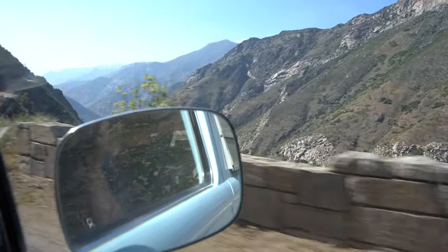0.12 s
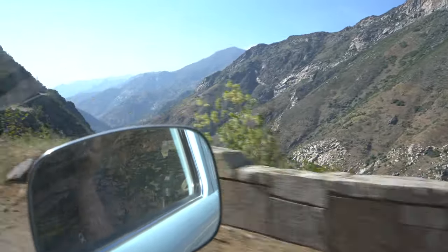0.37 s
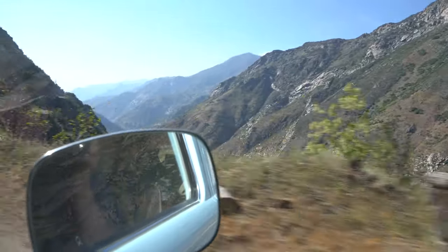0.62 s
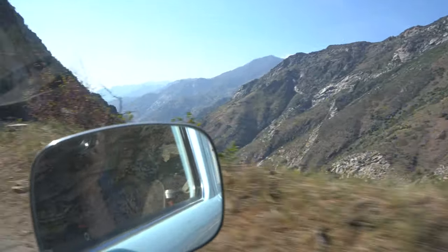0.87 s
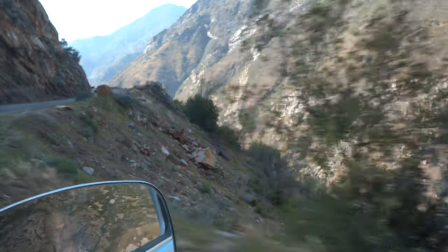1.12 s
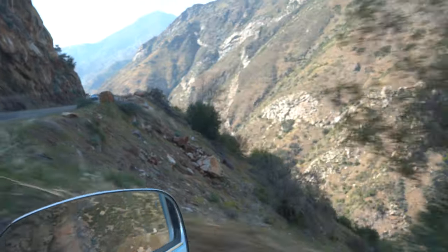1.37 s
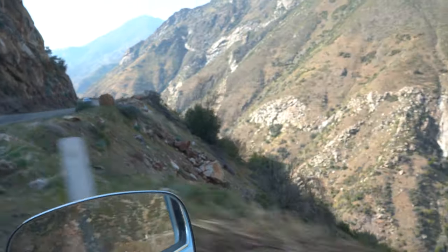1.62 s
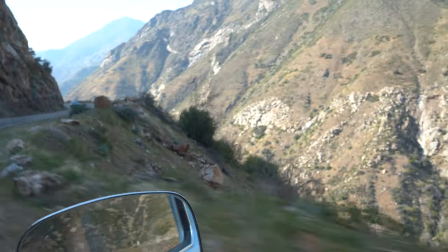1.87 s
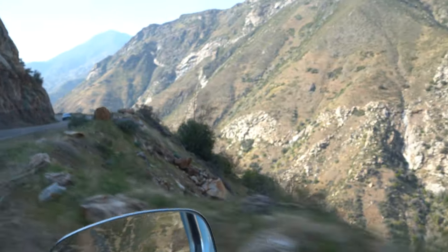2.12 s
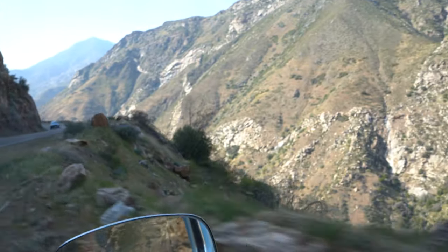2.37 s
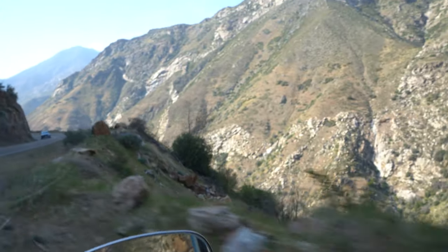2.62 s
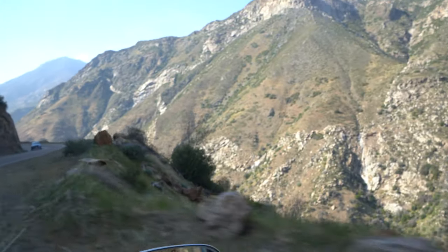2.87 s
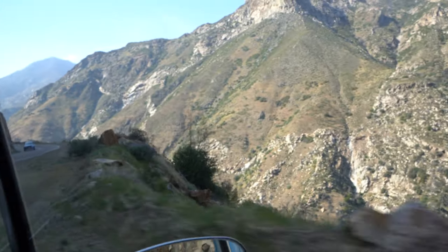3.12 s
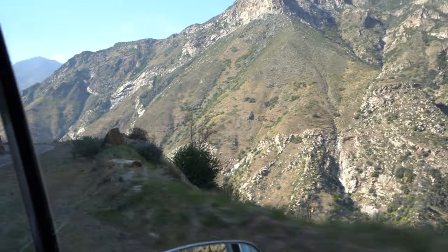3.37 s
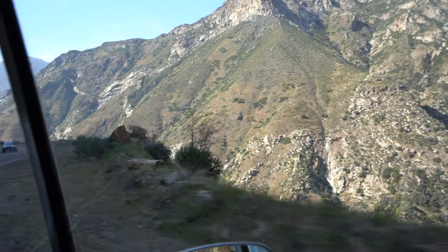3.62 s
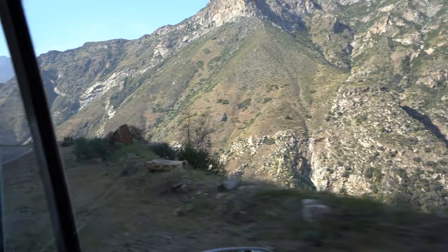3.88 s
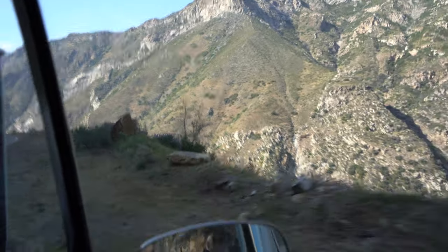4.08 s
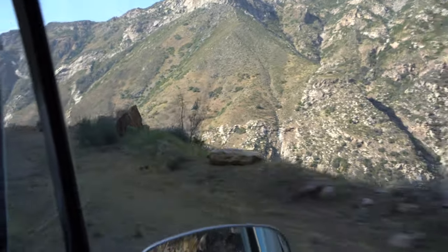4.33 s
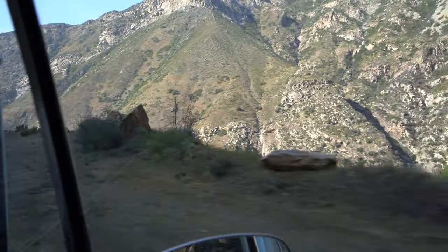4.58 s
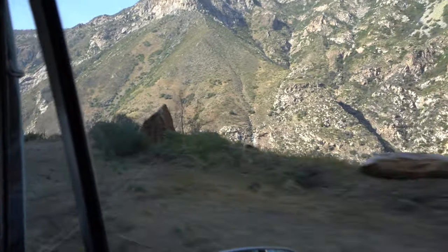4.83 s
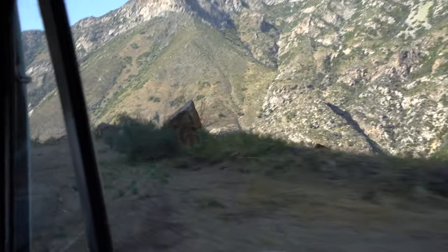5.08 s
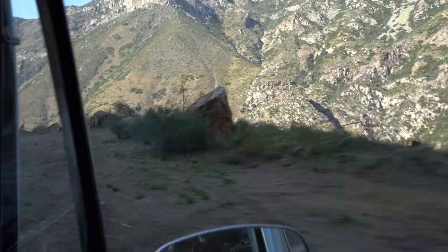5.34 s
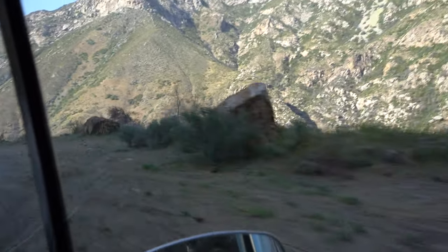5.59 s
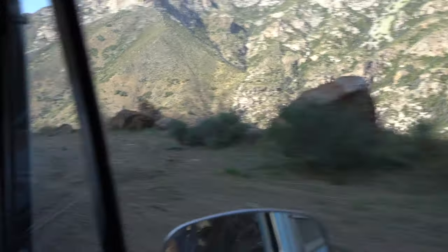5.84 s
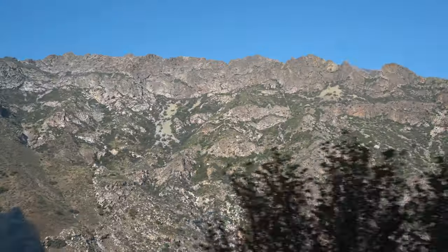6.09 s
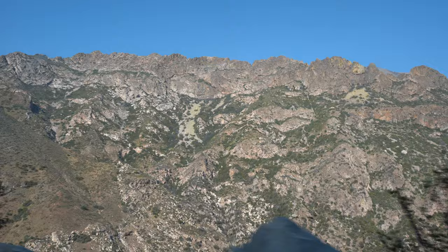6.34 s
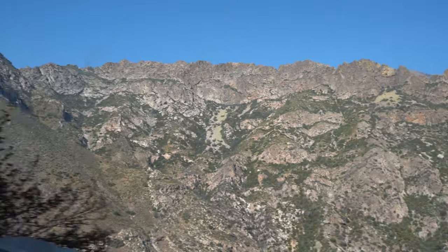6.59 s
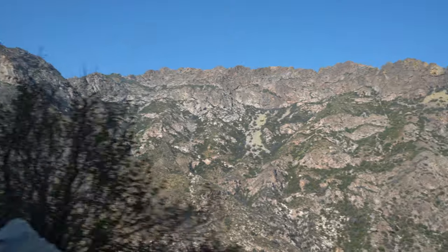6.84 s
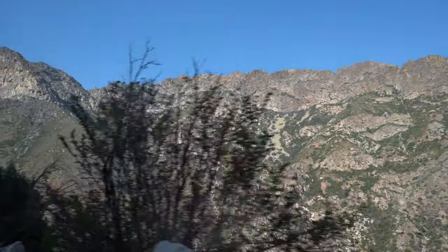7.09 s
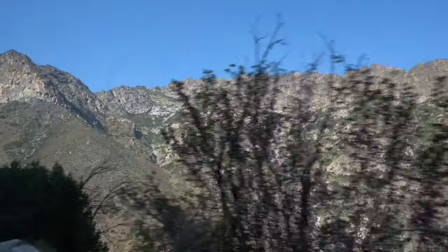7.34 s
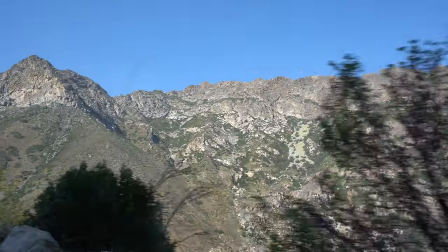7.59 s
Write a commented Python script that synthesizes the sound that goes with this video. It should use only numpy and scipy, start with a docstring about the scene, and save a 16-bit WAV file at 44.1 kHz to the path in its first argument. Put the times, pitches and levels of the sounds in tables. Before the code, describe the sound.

Inside an old van on a mountain road, a steady low air-cooled engine drone over road rumble, with trim rattles, ticks and tiny squeaks.

```python
"""Inside a van with the window open

The cab of a van with an air-cooled four-cylinder engine, on three stretches of road joined by short fades.
The engine is a harmonic series on the four-stroke cycle; road rumble, tyre noise and wind hiss are shaped
noise, coloured by resonances of the cab. Loose trim rattles as bursts of noise ringing through resonances,
a joint squeaks as short harmonic tones, and faint whines are sines that wander in pitch and level.
"""
import sys
import numpy as np
from scipy import signal
from scipy.io import wavfile
from scipy.ndimage import map_coordinates

SR = 44100
rng = np.random.default_rng(int(sys.argv[2]) if len(sys.argv) > 2 else 0)


def wrap_up_sound(samples):
    """Save the sound to the file named by the first command line argument, as 16-bit audio."""
    columns = np.atleast_2d(samples).T
    # keep every value between -1 and 1, then stretch to whole-number steps
    tamed = np.clip(columns, -1, 1)
    steps = np.round(tamed * 32767).astype(np.int16)
    wavfile.write(sys.argv[1], SR, steps)


N = 340011

STEP = 20   # samples between the values of a slow control
SLOW_T = np.arange(0, N + 20 * STEP, STEP) / SR   # times of the slow controls (s)

# Level difference between the ears: (frequency [Hz], left minus right [dB])
EAR_DIFFERENCE = [(60, -5.5), (150, -1.5), (380, -1.5), (950, -1), (2380, -1.0), (5980, 0), (15000, -1)]


def from_db(db):
    """Level to amplitude: 20 dB is a factor of ten."""
    return np.exp(np.asarray(db, float) * np.log(10) / 20)


def rms_one(x):
    """Normalisation to unit root-mean-square value."""
    return x / np.sqrt(np.mean(x ** 2) + 1e-20)


def fine(slow):
    """Linear interpolation of a slow control to one value a sample."""
    return np.interp(np.arange(N) / SR, SLOW_T, slow)


def in_time(stretches):
    """Linear interpolation in time: the columns of the joined tables become slow controls."""
    s, *columns = np.transpose(np.concatenate(stretches))
    return [np.interp(SLOW_T, s, column) for column in columns]


def at_hz(points, hz):
    """Interpolation of a spectrum on a logarithmic frequency axis."""
    table_hz, values = np.array(points).T
    return np.interp(np.log(hz), np.log(table_hz), values)


def drift(rate):
    """Random fluctuation of spread 1: noise through a double-pole low-pass at rate (Hz)."""
    run_in = 6000   # slow steps dropped while the filter settles
    r = np.exp(-2 * np.pi * rate * STEP / SR)
    noise = rng.standard_normal(len(SLOW_T) + run_in)
    slow = signal.lfilter([1], [1, -2 * r, r * r], noise)[run_in:]
    return rms_one(slow - slow.mean())


def resonance(x, hz, width):
    """Two-pole resonance: a damped mode of the given bandwidth (Hz), with gain 1 at its peak."""
    r = np.exp(-np.pi * width / SR)
    zeros = np.array([1, 0, -1]) * (1 - r * r) / 2
    return signal.lfilter(zeros, [1, -2 * r * np.cos(2 * np.pi * hz / SR), r * r], x)


def panned(x, left_db):
    """Interaural level difference: mono to stereo, the left louder by left_db."""
    return np.array([x * from_db(left_db / 2), x * from_db(-left_db / 2)])


def engine(firing_waver_db=.6, waver_db=1.3):
    """Harmonic series: orders of the four-stroke cycle as wavering sines; the load sets their balance."""
    # Multiples of the cycle frequency; order 4 is the firing tone
    orders = [2, 3, 4, 5, 6, 8, 9, 10, 11, 12, 13, 15, 16, 18, 20, 21, 25, 28]
    # Level of each of those orders [dB] at light, half and full load
    light_db = (-35.5, -38, -27, -35.5, -41.5, -41.5, -41.5, -51.5, -66, -48, -56, -57, -70, -63, -65, -68,
                -82, -70)
    half_db = (-48, -43, -25.5, -36, -32.5, -40, -46, -40.5, -40.5, -45, -52, -47, -55.5, -48, -57, -60,
               -73, -61)
    full_db = (-65, -52, -23.5, -31, -49, -50, -39, -30, -43.5, -60, -49, -39.5, -49, -51.5, -57, -51.5,
               -49, -52)
    # Running of the engine: (time [s], firing rate [1/s], load [0-1])
    running = [(0, 71.7, .5), (.99, 72.5, .5), (.995, 75.5, 0), (4.9, 77.2, 0), (5.99, 77.1, 0),
               (6, 71.0, .42), (6.75, 69.6, .42), (6.95, 68.9, 1), (7.71, 68.9, 1)]

    firing_rate, load = in_time([running])
    unsteady_rate = firing_rate * (1 + .001 * drift(4))
    cycle = np.cumsum(np.pi / 2 * unsteady_rate) * STEP / SR   # phase; four firings a cycle
    out = 0
    for order, *load_db in zip(orders, light_db, half_db, full_db):
        waver = (firing_waver_db if order == 4 else waver_db) * drift(4.2)
        level = from_db(np.interp(load, [0, .5, 1], load_db) + waver)
        tone = level * np.sin(order * cycle + rng.uniform(0, 2 * np.pi))
        out = out + panned(tone, at_hz(EAR_DIFFERENCE, 18.5 * order))   # cycle taken as 18.5 Hz
    # the sines were computed at the slow rate
    out = signal.resample_poly(out, STEP, 1, axis=1, window=("kaiser", 10))
    return np.sqrt(2) * out[:, :N]


def road_and_wind(gust_db=1.5, flutter_db=1.0, own_db=1.17):
    """Addition of powers: third-octave noise bands sum the power of rumble, tyres and wind."""
    # Level of the noise, one table a stretch: (time [s], rumble [dB], tyres [dB], wind [dB])
    noise_levels = [
        [(0, -27, -38, -57.5), (.6, -26, -38.5, -60), (.98, -28, -39.5, -56.5)],
        [(1.01, -30, -42.5, -61), (2, -30, -43.5, -63), (3.3, -32, -44, -63.5), (4.6, -31.5, -45.5, -62),
         (5.3, -32.5, -44.5, -58), (5.6, -35.5, -43.5, -64), (5.98, -32, -43, -63.5)],
        [(6.01, -28, -42, -57.5), (6.4, -31.5, -43, -59), (7, -30.5, -41, -59.5), (7.71, -30.5, -42, -56)],
    ]
    # Relative spectra: (frequency [Hz], density [dB per Hz])
    rumble_spectrum = [(20, -20), (30, -7.5), (42, -8.5), (60, 0), (95, -1.5), (130, -6.5), (190, -9.5),
                       (250, -14), (330, -19), (450, -33), (800, -42), (2000, -101)]
    tyre_spectrum = [(100, -4), (300, 6.5), (500, 1.5), (700, -1.5), (950, -2), (1150, -5), (1500, -7),
                     (2000, -12.5), (2700, -18), (3500, -20), (5000, -31.5), (12000, -48)]
    wind_spectrum = [(800, -7), (2500, 8), (4000, 0), (5000, 3), (6500, -2), (8000, -7.5), (10000, -6),
                     (13000, -12.5), (15500, -20), (17000, -22)]
    # Correlation of the ears: (frequency [Hz], left-right likeness [-1 to 1])
    ear_likeness = [(60, 0.94), (130, 0.7), (290, 0.69), (640, 0.066), (1410, 0.76), (3100, 0.13),
                    (6820, 0.068), (15000, 0.2)]

    edges = 20 * 2 ** (np.arange(30) / 3)
    centres = np.sqrt(edges[1:] * edges[:-1])
    rumble_db, tyre_db, wind_db = in_time(noise_levels)
    rumble_db = rumble_db + .6 * drift(3)
    wind_db = wind_db + gust_db * drift(17) + flutter_db * drift(44)   # the airstream past the window buffets
    # (spectrum, level, low Hz, high Hz): the level holds for the bands centred between low and high
    layers = [(rumble_spectrum, rumble_db, 110, 400),
              (tyre_spectrum, tyre_db, 500, 2500),
              (wind_spectrum, wind_db, 4000, 15000)]
    shares, powers = [], []
    for spectrum, level_db, low, high in layers:
        band_power = from_db(2 * at_hz(spectrum, centres)) * np.diff(edges)
        shares.append(band_power / band_power[(centres > low) & (centres < high)].sum())
        powers.append(from_db(2 * level_db))

    white = rng.standard_normal((2, 2, N + 8000))   # two mid-side pairs, with a run-in for the filters
    out = 0
    for k, hz in enumerate(centres):
        sos = signal.butter(2, edges[k:k + 2], "band", fs=SR, output="sos")
        band = signal.sosfilt(sos, white[k % 2])[:, -N:]   # neighbouring bands use different noise
        mid, side = band * np.sqrt(SR / 2 / (edges[k + 1] - edges[k]))   # about unit rms
        alike = np.clip(at_hz(ear_likeness, hz), -.99, .99)
        power = sum(share[k] * layer_power for share, layer_power in zip(shares, powers))
        gain = np.sqrt(power) * from_db(own_db * drift(8.5))
        # this much side signal gives the wanted correlation of the ears
        pair = mid + np.sqrt((1 - alike) / (1 + alike)) * side * [[1], [-1]]
        out = out + panned(fine(gain), at_hz(EAR_DIFFERENCE, hz)) * pair
    return out


def cab(x):
    """Room modes: each resonance of the cab lifts or sinks its own narrow band."""
    # Resonances and dips of the cab: (frequency [Hz], width [Hz], gain [dB])
    cab_modes = [(59, 13, -2), (77, 8.6, -3), (108, 5.5, 2.5), (138.6, 12, -1), (174, 24, 2),
                 (240, 16, -3.5), (348, 55, -2), (563, 84, 2), (926, 69, -4.5), (1970, 81, -4.5),
                 (3920, 170, -4.5), (5150, 540, 1.5)]
    for hz, width, db in cab_modes:
        x = x + (from_db(db) - 1) * resonance(x, hz, width)
    return x


def rattles(small_per_s=25.0, small_db=-63, spread_db=3.0, low_longer=1.3):
    """Excited resonances: bumps shake the trim, bursts of tiny contacts ring it; the lows last longer."""
    # Trim rattles: (time [s], level [dB], low range [dB], top range [dB]), ranges relative to the middle one
    bumps = [(.055, -49, 1, -6), (0.233, -42.5, 9.5, -14), (.3194, -52, -4, -4), (.394, -53, 6, -16),
             (.6315, -43.5, 7.5, -20), (.798, -55, 1, -2), (1.486, -54, 3, -6), (1.895, -68, 1, -10),
             (1.97, -53, 2, -4), (2.078, -57, 4, -3), (2.17, -52, 0, 1), (2.223, -56, -8, 3),
             (2.265, -48.5, -6, -5), (3.4186, -59, 6, -18), (3.95, -47.5, 2, -15), (3.988, -50.5, 3, -2),
             (4.0796, -51, 3.5, -4), (4.296, -48, 2, -9), (4.359, -49.5, -10, -2), (4.402, -56, -5, -21),
             (4.505, -48, -2, -2), (4.596, -50, -3, -2), (4.6713, -50, 0, -22), (4.714, -47.5, -5, -2.5),
             (4.865, -46, 7, -3), (4.934, -50, -1, -4), (5.0449, -54, 1, 0), (5.101, -52, -8, -21),
             (5.167, -54, -4, -17), (5.261, -37.5, -2.5, -5), (5.3403, -50, 2, -18), (5.388, -51, 9, -17),
             (5.477, -49.5, -3, -3), (6.063, -52, 3, -12), (6.3724, -54, -4, -14), (6.5594, -55, -2, -3),
             (6.608, -49, 6, -18), (6.632, -55, 8, -10), (7.0544, -49, -3, -22), (7.217, -57, -8, -18),
             (7.332, -51, -12, -11), (7.417, -48, 1, -20), (7.4994, -54, 6, -12)]
    # Single sharp ticks: (time [s], level [dB])
    sharp_ticks = [(.6794, -51), (0.7232, -25.5), (.8894, -53), (2.138, -40), (2.17, -44.5), (2.6943, -50),
                   (6.5359, -39), (6.59, -48), (6.9691, -41), (7.2009, -50)]
    # Low, middle and top range of the trim: (low edge [Hz], high edge [Hz], resonances (Hz, width [Hz]))
    trim_ranges = [(1200, 5200, [(1750, 250), (2150, 300), (2800, 500), (3600, 700), (4700, 900)]),
                   (5000, 9400, [(5600, 1200), (6500, 1200), (7700, 1800)]), (9200, 16500, [(10800, 2500),
                   (13800, 3500)])]
    rattle_s, tick_s, rise_s = 0.014, 0.0012, .002   # decay of rattles and ticks, longest rise
    bright_left_db, left_per_dull = -4.5, 0.29   # bright rattles sit right; left dB per dB of lost top
    tick_low_db, tick_top_db, tick_left_db = -18, -13, 2

    # each event: (time s, level dB, low dB, top dB, decay s, left minus right dB)
    events = [(s, db, low_db, top_db, rattle_s, bright_left_db - left_per_dull * top_db)
              for s, db, low_db, top_db in bumps]
    events += [(s, db, tick_low_db, tick_top_db, tick_s, tick_left_db) for s, db in sharp_ticks]
    # small random rattles fill the gaps
    for place, loud, bright, long, side in rng.random((int(small_per_s * N / SR), 5)):
        db = small_db + spread_db * min(-np.log(loud), 2)
        events.append((place * N / SR, db, -6, 8 * bright - 10, 0.0025 + 0.0097 * long, 6 * side - 4))

    shaking = np.zeros((3, 2, N))   # envelopes: range, ear, time
    t = np.arange(SR // 14) / SR
    for s, db, low_db, top_db, length, left_db in events:
        at = int(s * SR)
        lengths = length * np.array([[low_longer], [1], [1]])
        range_gain = from_db(db + np.array([[low_db], [0], [top_db]]))
        rise = 1 - np.exp(-t / min(rise_s, length / 8))
        shake = range_gain * np.exp(-(t / lengths) ** 1.4) * rise
        shaking[:, :, at:at + len(t)] += panned(shake, left_db).swapaxes(0, 1)[..., :N - at]

    contacts = rng.standard_normal((2, N)) * fine(from_db(1.5 * drift(200)))
    out = 0
    for level, (low, high, modes) in zip(shaking, trim_ranges):
        sos = signal.butter(2, [low, high], "band", fs=SR, output="sos")
        # alternate signs; the root evens out the power of narrow and wide modes
        rung = sum((-1) ** k * resonance(contacts, hz, width) / np.sqrt(width)
                   for k, (hz, width) in enumerate(modes))
        out = out + level * rms_one(signal.sosfilt(sos, rung))
    return out


def squeaks(rough=0.3, sag=0.005):
    """Stick-slip in a joint: a short uneven tone with harmonics, sagging in pitch."""
    # Squeaks: (time [s], level [dB], frequency [Hz], second harmonic [dB re fundamental])
    squeak_events = [(4.2946, -50, 3980, -1), (4.6, -55, 3880, -11), (4.751, -45, 4020, -8),
                     (4.865, -47, 4040, -7), (5.2135, -52, 4090, -13), (5.338, -48, 4000, -15),
                     (5.4368, -52, 3940, -15), (5.508, -45, 3980, -8), (5.573, -51.5, 3960, -6),
                     (5.657, -41.5, 4000, -6), (5.916, -53, 4000, -10)]
    # Third and fourth harmonic [dB re fundamental]
    upper_db = (-20, -19)
    squeak_s = 0.024   # decay time
    out = np.zeros(N)
    uneven = fine(np.maximum(1 + rough * drift(110), 0))
    wobble = fine(drift(150))
    t = np.arange(int(3 * squeak_s * SR)) / SR
    for s, db, hz, second_db in squeak_events:
        at = int(s * SR)
        span = slice(at, at + len(t))
        pitch = hz * (1 - sag * t / squeak_s + 0.009 * wobble[span])
        phase = np.cumsum(2 * np.pi * pitch) / SR
        shape = (1 - np.exp(-t / 0.0029)) * np.exp(-(t / squeak_s) ** 2)
        harmonics_db = (0, second_db, *upper_db)
        tone = sum(from_db(d) * np.sin((k + 1) * phase) for k, d in enumerate(harmonics_db))
        out[span] += from_db(db) * shape * tone * uneven[span]
    return out


def whines(waver_db=3.0):
    """Frequency and amplitude modulation: faint tones wander quickly in pitch and level."""
    # Whines: (start [s], end [s], frequency [Hz], wander [Hz], level [dB])
    faint_tones = [(0, .99, 1040, 14, -56), (0, .99, 2600, 8, -63), (1, 5.99, 566, 6, -58),
                   (1, 4, 840, 9, -60), (1, 5.99, 1115, 5, -59), (1, 5.99, 1345, 10, -59.5),
                   (2.8, 5.99, 2740, 14, -64), (3.4, 5.99, 2440, 18, -71), (6, 7.71, 1000, 11, -55),
                   (6, 6.8, 1510, 10, -61), (6, 7.71, 1770, 12, -65), (5.6, 7.71, 3310, 8, -63.5),
                   (6.6, 7.71, 488, 3, -50), (6.8, 7.71, 1205, 14, -62), (6.8, 7.71, 1460, 11, -54)]
    fade_s = .1   # centred on start and end
    t = np.arange(N) / SR
    out = 0
    for start, end, hz, wander, db in faint_tones:
        held = np.clip(.5 + np.minimum(t - start, end - t) / fade_s, 0, 1)
        phase = np.cumsum(2 * np.pi * (hz + wander * fine(drift(15)))) / SR
        level = fine(from_db(db + waver_db * drift(5.0)))
        out = out + np.sqrt(2) * held * level * np.sin(phase)
    return out


def scene():
    """Superposition with an interaural delay: engine, road, wind and whines reach the right ear later."""
    right_lag_s = 5 / SR
    left, right = engine() + cab(road_and_wind()) + whines()
    right = map_coordinates(right, [np.arange(N) - right_lag_s * SR], order=1, mode="nearest")
    return np.array([left, right]) + rattles() + panned(squeaks(), -2.5)


def low_pass(x):
    """Removes everything above the highest recorded frequency."""
    return signal.sosfilt(signal.butter(12, 16440, fs=SR, output="sos"), x)


def record(dry):
    """Saturation and band-limiting: peaks are rounded, each join fades out and in, the top is cut."""
    # Joins between stretches: (moment of silence [s], half-length of the fade [s])
    join_fades = [(.9925, .016), (5.9975, .016)]
    peak_top, top_hz = 0.4, 15850
    t = np.arange(N) / SR
    mix = peak_top * np.tanh(dry / peak_top)
    for s, half in join_fades:
        mix = mix * np.sin(np.pi / 2 * np.clip(abs(t - s) / half, 0, 1)) ** 4
    # steep low-pass: 0.5 dB ripple, 50 dB down beyond the edge
    mix = signal.sosfilt(signal.ellip(12, .5, 50, top_hz, fs=SR, output="sos"), mix)
    return low_pass(mix)


dry = scene()
out = record(dry)
wrap_up_sound(out)
```